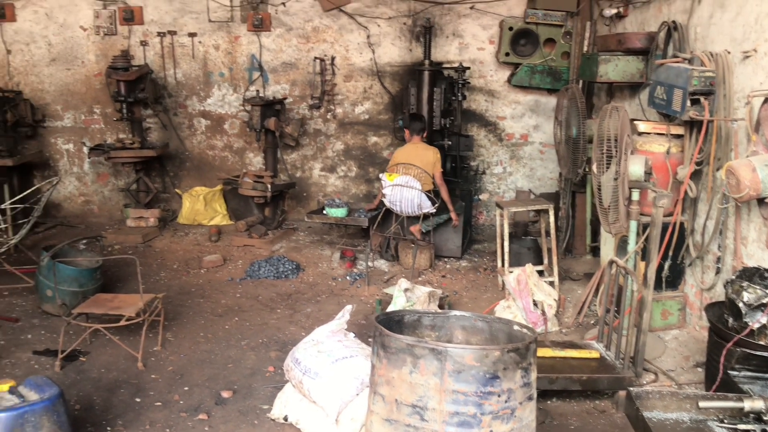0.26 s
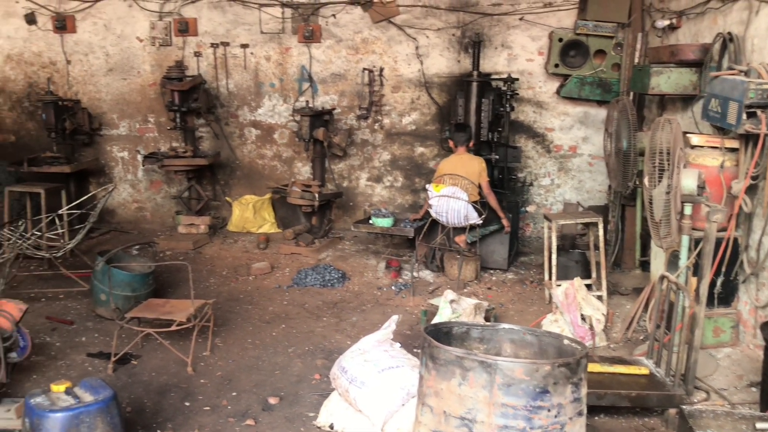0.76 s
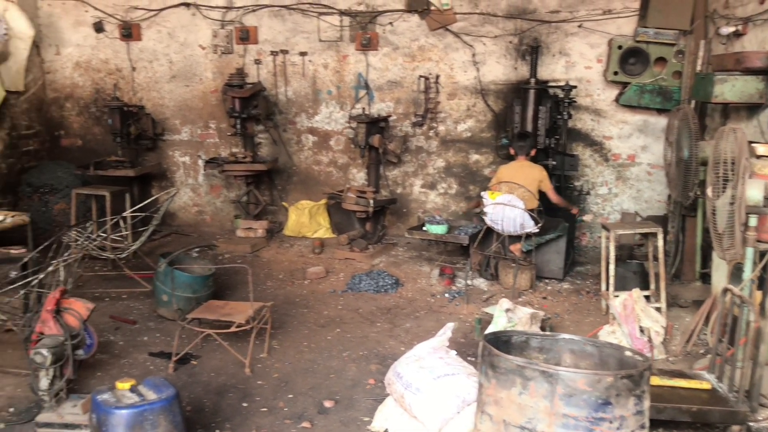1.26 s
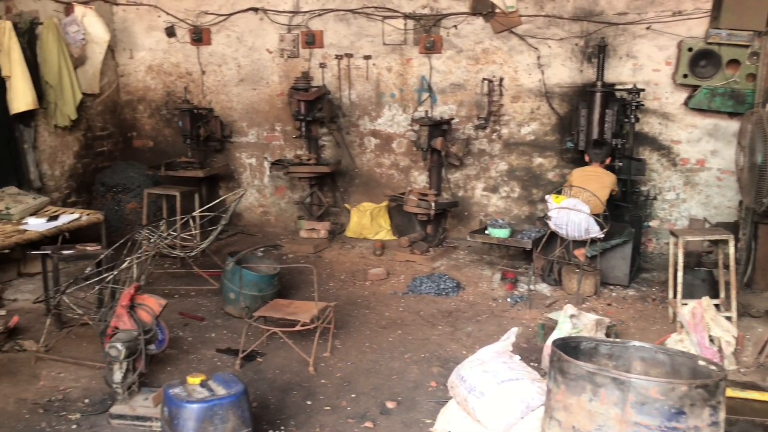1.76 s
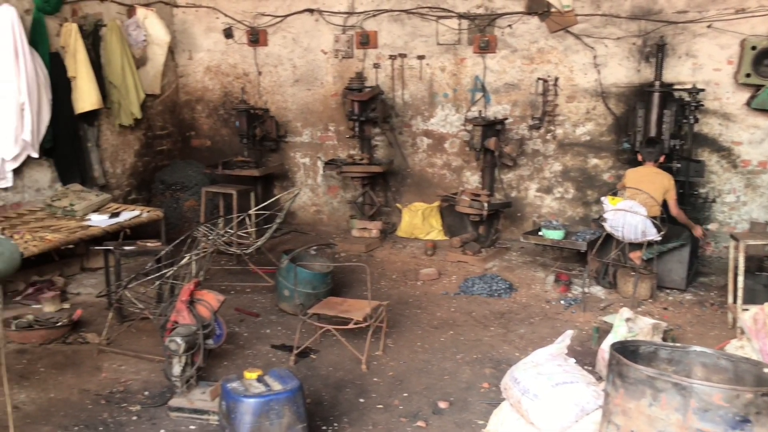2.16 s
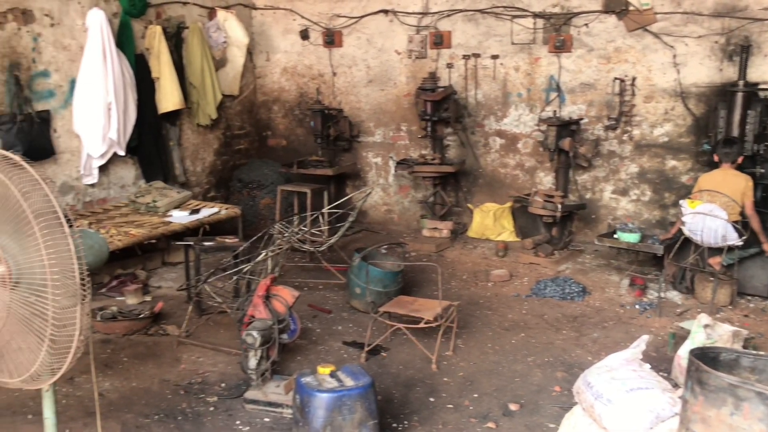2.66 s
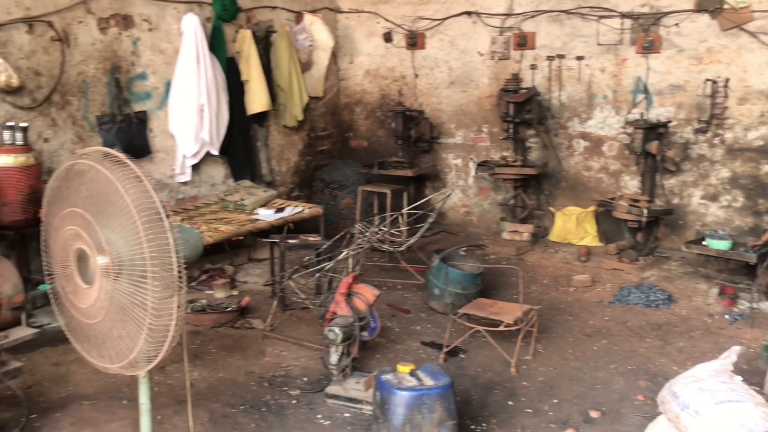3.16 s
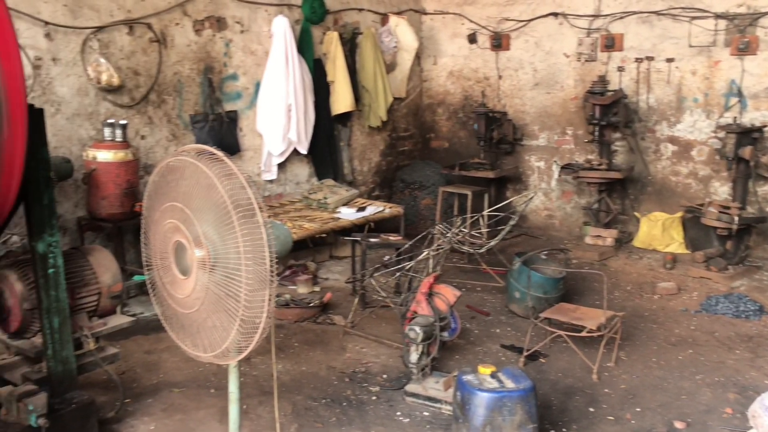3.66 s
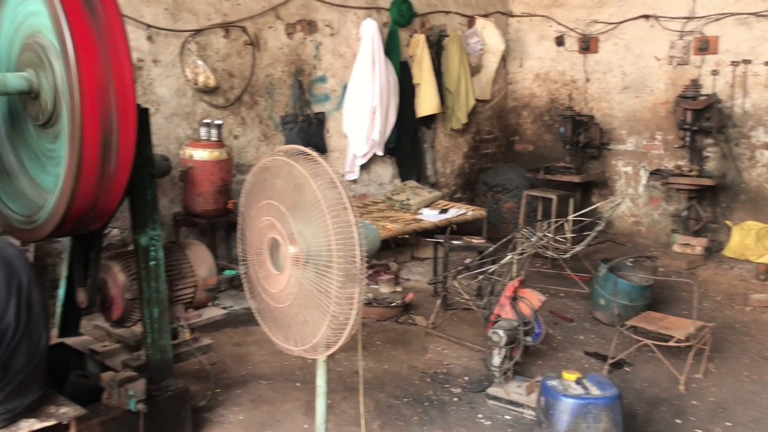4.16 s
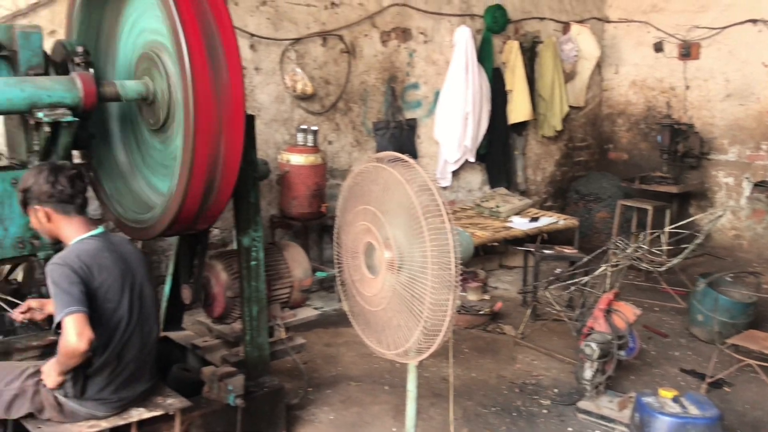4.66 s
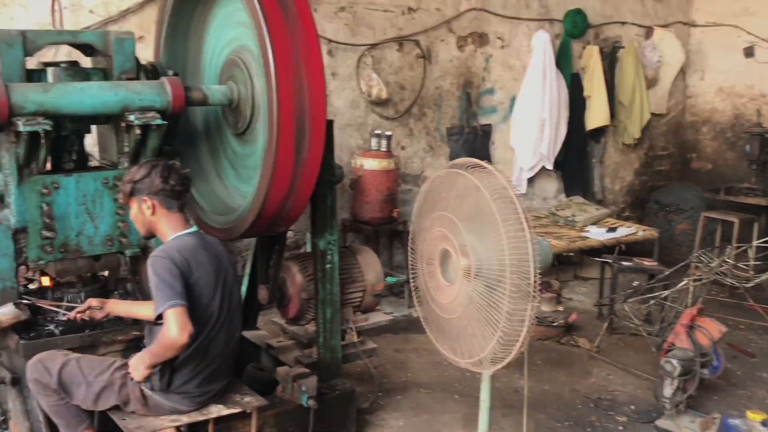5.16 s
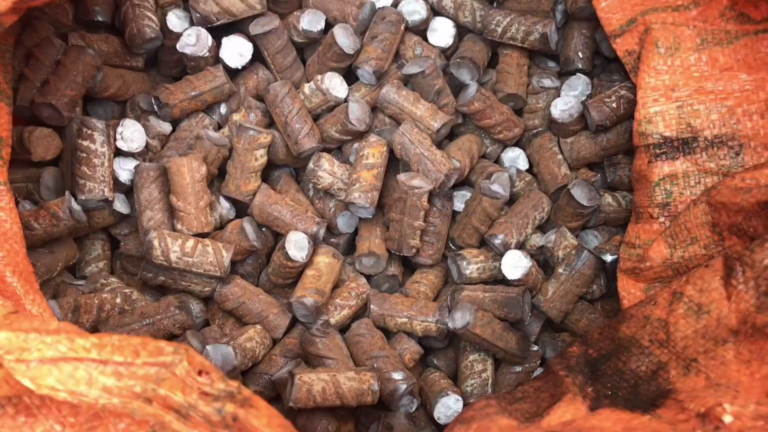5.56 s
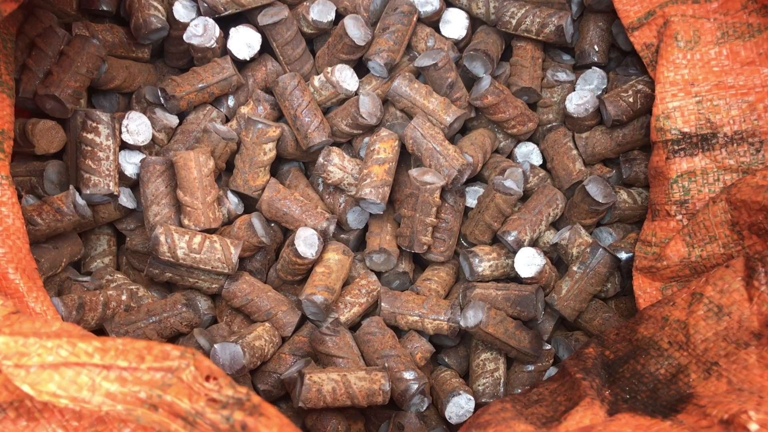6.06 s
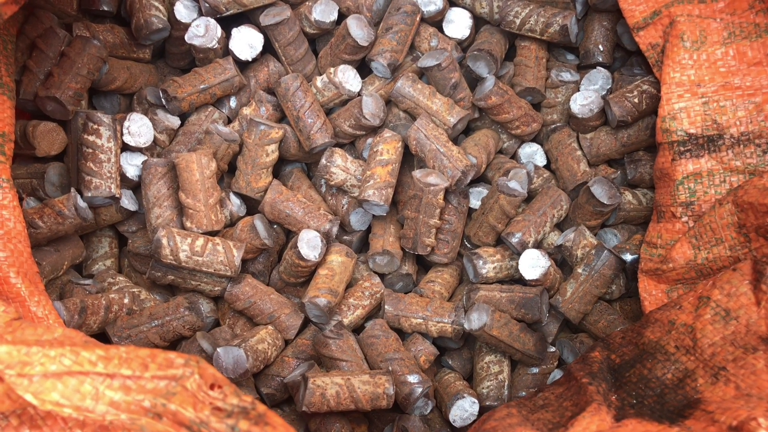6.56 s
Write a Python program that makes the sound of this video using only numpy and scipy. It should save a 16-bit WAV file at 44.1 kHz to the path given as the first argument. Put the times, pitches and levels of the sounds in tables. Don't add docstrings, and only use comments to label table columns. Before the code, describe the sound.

Loud, irregular metal clanks, thuds and rattles ring over rumbling workshop machinery with air hisses, then cut abruptly to a very faint low murmur.

```python
import sys
import numpy as np
from scipy import signal
from scipy.fft import rfft, irfft, next_fast_len
from scipy.io import wavfile
from scipy.ndimage import uniform_filter1d

SR = 44100
rng = np.random.default_rng(int(sys.argv[2]) if len(sys.argv) > 2 else 0)


def master_out(mix):
    frames = np.transpose(np.atleast_2d(mix))
    ceiling = np.clip(frames, -1, 1)
    pcm = np.round(ceiling * 32767).astype(np.int16)
    wavfile.write(sys.argv[1], SR, pcm)


def boost_factor(decibels):
    exponent = np.asarray(decibels, float) / 20
    return 10 ** exponent


N = 300762
T = np.arange(N) / SR


def noise():
    return rng.standard_normal(N)


def level(x, db):
    return x * boost_factor(db) / np.sqrt(np.mean(x ** 2))


def colour(x, table):
    size = 8192
    hz = np.maximum(np.fft.rfftfreq(size, 1 / SR), 1)
    f, db = np.transpose(table)
    ceps = irfft(np.interp(np.log(hz), np.log(f), db) * np.log(10) / 20)
    ceps[1:size // 2] *= 2
    ceps[size // 2 + 1:] = 0
    return signal.fftconvolve(x, irfft(np.exp(rfft(ceps))))[:N]


def resonate(x, hz, width_hz):
    return signal.lfilter(*signal.iirpeak(hz, hz / max(width_hz, 2), fs=SR), x)


def resonate_body(x, modes, widen=1):
    out = np.zeros(N)
    for k, (hz, width_hz, db) in enumerate(modes):
        out += (-1) ** k * boost_factor(db) * resonate(x, hz, widen * width_hz)
    return out


def walk(rate):
    k = int(SR / rate)
    held = np.repeat(rng.standard_normal(N // k + 1), k)
    return 1.44 * uniform_filter1d(uniform_filter1d(held, k), k)[:N]


def grit(scatter_db, smooth):
    size_db = scatter_db * np.minimum(rng.exponential(size=N), 6)
    ticks = noise() * boost_factor(size_db) * (rng.random(N) < .05)
    return level(level(ticks, 0) + smooth * noise(), 0)


def slices(x, per_octave, patchy_db, rate):
    size = next_fast_len(N)
    spec = rfft(x, size)
    octaves = np.log2(np.fft.rfftfreq(size, 1 / SR) + 1)
    for centre in np.arange(4, 14.1, 1 / per_octave):
        window = np.clip(1 - per_octave * abs(octaves - centre), 0, 1)
        yield 2 ** centre, irfft(spec * window, size)[:N] * boost_factor(patchy_db * walk(rate))


# start in [s], blow in [dB], frame thud and brightness in [dB re blow], bar pitch in [Hz].
STROKES = [(0.763, -6.5, -2.5, -10.5, 1260), (.826, -5.5, -6, -15, 373), (.855, -10.5, 1, -7, 603),
           (.931, -14.5, 3, -9, 540), (1.203, -9, -1, -9, 862), (1.269, -10, -2, -11.5, 368.5),
           (1.3095, -8.5, -0.5, -6.5, 624), (2.352, -11.5, 3, -10, 755), (2.384, -8, -8.5, -6.5, 620),
           (2.4694, -10.5, -3.5, -8.5, 688), (2.5873, -8, -0.1, -13.5, 363), (2.915, -22, 8, -12, 287),
           (3.4283, -8, -1, -13.5, 692), (3.4925, -7.5, -1.9, -10.5, 640), (3.5294, -7, -1, -9.5, 1180),
           (3.982, -7, 0.2, -9.5, 603), (4.042, -22, 6, -19, 374), (4.705, -16, 4.5, -18.5, 837),
           (4.941, -10.5, -0.5, -15, 1320), (5.105, -8, -0.5, -16, 709), (5.2515, -10, 2.5, -13, 1222),
           (5.269, -12, 2, -12, 367)]
# start in [s], blow in [dB], brightness in [dB re blow], lower and upper pitch in [Hz].
CLANGS = [(1.236, -5.5, -12, 1280, 2620), (2.1025, -3.5, -7.5, 896, 2590), (2.219, -3.5, -16, 903, 2500),
          (2.246, -7.5, -13.5, 881, 2450), (2.292, -11.5, -15, 915, 2130), (2.4327, -3, -17.5, 670, 2170),
          (3.839, -8, -11.5, 885, 2010), (3.872, -2.5, -7, 877, 2676), (3.926, -4.5, -13, 760, 2460),
          (4.702, -5.5, -12.5, 1177, 2638), (4.961, -7.5, -8, 696, 2710), (5.069, -2.5, -8, 1010, 1930),
          (5.148, -15.5, -19, 1170, 2160)]
# start in [s], blow in [dB], frame thud and brightness in [dB re blow].
KNOCKS = [(.157, -24.5, 2.5, -11), (.26, -24.5, 5.5, -12), (.795, -7, -11, -6.5), (1.032, -16.5, -5.5, -14),
          (1.19, -14.5, 3.5, -7), (1.337, -7.5, -7.5, -17), (1.484, -29.5, 10.5, -8.5),
          (1.525, -28, -6, -2), (1.639, -18.5, -1, -0.5), (2.087, -8.5, -13, -9), (2.137, -9, -12.5, -13),
          (2.6194, -20, -2.5, -20.5), (2.802, -22, 1.5, -16), (2.853, -16, -6.5, -13),
          (3.087, -24, -7, -6.5), (3.167, -18.5, -1.5, -11), (3.206, -22.5, -4.5, -1),
          (3.448, -6, -10.5, -10.5), (3.561, -12, -3, -9.5), (3.665, -16, -4, -8.5),
          (3.739, -14.5, -9, -14), (3.797, -14, -4.5, -7.5), (4.008, -16.5, -3.5, -16), (4.19, -26, -2, -7),
          (4.312, -16, -6.5, -3), (4.884, -19.5, -9.5, -12.5), (5.304, -19, 2.5, -18.5),
          (5.361, -16, -1.5, -5)]
STROKE_RATTLE_S, CLANG_RATTLE_S, KNOCK_RATTLE_S = .03, .016, .03
STROKE_SIZZLE_DB, CLANG_SIZZLE_DB, KNOCK_SIZZLE_DB = -7.5, -8, -7
CLANG_THUD_DB = -8.5


def strikes():
    rows = []
    for s, db, thud, bright, _ in STROKES:
        rows.append((s, db, thud, bright, bright + STROKE_SIZZLE_DB, STROKE_RATTLE_S))
    for s, db, bright, _, _ in CLANGS:
        rows.append((s, db, CLANG_THUD_DB, bright, bright + CLANG_SIZZLE_DB, CLANG_RATTLE_S))
    for s, db, thud, bright in KNOCKS:
        rows.append((s, db, thud, bright, bright + KNOCK_SIZZLE_DB, KNOCK_RATTLE_S))
    return np.transpose(rows)


def bursts(db, rise, t60, uneven_db):
    power = np.zeros(N)
    t = T[:int(.45 * SR)]
    start_s, *_, rattle_s = strikes()
    for start, rattle, gain in zip(start_s, rattle_s, boost_factor(db)):
        decay = np.exp(-np.log(1000) * np.maximum(t - max(rattle, 0), 0) / t60)
        shape = np.minimum(t / rise, 1) * decay
        power[int(start * SR):][:len(t)] += (gain * shape) ** 2
    return np.sqrt(power) * boost_factor(uneven_db * walk(70))


# centre in [Hz], width in [Hz], level in [dB].
FRAME = [(332, 170, 6.5), (624, 100, 11.5), (890, 86, 0), (1180, 19, 2.5), (1440, 74, -4.5)]


def frame_thud():
    _, blow_db, thud_db, *_ = strikes()
    knock = grit(2.5, 1.3)
    modes = resonate_body(knock, FRAME, widen=1.1)
    bulk = resonate(resonate(knock, 750, 1300), 750, 1300)
    frame = level(modes, -1.5) + level(bulk, -1.5)
    return level(frame, -7) * bursts(blow_db + thud_db, .0049, .18, 2.2)


# frequency in [Hz], density in [dB per Hz].
CRASH_COLOUR = [(760, -25), (1300, -1.5), (1740, -11.5), (2640, -1.5), (3290, -10.5), (3830, -11.5),
                (4920, -17.5), (5310, -8), (8000, -21), (10400, -46), (17600, -120)]
# centre in [Hz], width in [Hz], level in [dB].
PRESS = [(2027, 67, 4.5), (2630, 260, -3.5), (3790, 30, 6.5), (4660, 190, -5), (5320, 190, 5),
         (6160, 340, -5.5), (7340, 110, -13)]


def steel_crash():
    _, blow_db, _, crash_db, *_ = strikes()
    steel = grit(1.1, 0.67)
    press = resonate_body(steel, PRESS, widen=1.5)
    spec = rfft(level(colour(steel, CRASH_COLOUR), -1.2) + level(press, -4.5))
    upper = np.clip((np.fft.rfftfreq(N, 1 / SR) - 3000) / 600, 0, 1)
    blow = level(irfft(spec * (1 - upper), N), -14) * bursts(blow_db, .0059, .23, 1.7)
    crash = level(irfft(spec * upper, N), -8.5) * bursts(blow_db + crash_db, .011, .22, 1.6)
    return blow + crash


# frequency in [Hz], density in [dB per Hz].
SIZZLE_COLOUR = [(4120, -31), (7000, -8.5), (8620, -7), (9900, 1), (10500, -5), (11200, -2), (11900, -3.5),
                 (12900, 1.5), (13800, -2.5), (15600, -12.5)]


def scale_sizzle():
    _, blow_db, _, _, sizzle_db, _ = strikes()
    return level(colour(grit(2.2, 1.2), SIZZLE_COLOUR), -3) * bursts(blow_db + sizzle_db, .012, .18, 3.1)


def ring(rings, level_db, rattle, t60):
    out, t = np.zeros(N), T[:int(.4 * SR)]
    split = rng.standard_normal((len(rings), 2))
    for (s, db, first_hz, second_hz, second_db), detune in zip(rings, split):
        gains = boost_factor(db + np.array([0, second_db]))
        for hz, gain, apart in zip((first_hz, second_hz), gains, detune):
            push = rng.standard_normal(len(t)) * np.exp(-t / rattle)
            pair_hz = hz * (1 + .0061 * apart * np.array([0, 1]))
            poles = np.exp(2j * np.pi * pair_hz / SR - np.log(1000) / (t60 * SR))
            tone = np.zeros(len(t))
            for pole, weight in zip(poles, (1, .6)):
                tone += weight * signal.lfilter([1], [1, -pole], push).imag
            out[int(s * SR):][:len(t)] += gain * tone / np.abs(tone).max()
    return boost_factor(level_db) * out


# start in [s], level in [dB], pitch in [Hz], plate in [dB re offcut].
OFFCUTS = [(.797, -12, 5300, -11.5), (1.19, -16, 5270, -8), (1.2344, -10.5, 5320, -1),
           (1.2714, -21.5, 5310, -3.5), (1.3164, -14, 6350, -4), (2.1106, -15, 6410, -7),
           (2.14, -15.5, 5220, -1), (2.224, -16, 5280, 1.5), (2.2543, -19.5, 5330, -8),
           (2.3012, -18, 5150, 0.5), (2.3935, -12, 5220, -3), (2.4332, -16.5, 6170, -9),
           (2.5955, -24, 5580, -9), (3.4546, -18, 5970, -5.5), (3.5644, -21.5, 5200, -6.5),
           (3.8462, -20.5, 6400, -1.5), (3.8844, -14.5, 6160, -4.5), (3.929, -14.5, 5200, 3),
           (3.9917, -19.5, 6140, -6.5), (4.3251, -20, 5320, -14), (4.7144, -16.5, 6030, -19),
           (4.9025, -26.5, 5300, -7.5), (4.9695, -12, 6120, -18.5), (5.0786, -14, 5310, -17.5),
           (5.1294, -19.5, 6220, -10), (5.279, -16.5, 6220, -13)]
RING_LAG_S = .005
STROKE_RING_DB, STROKE_UPPER_HZ, STROKE_UPPER_DB = 2.5, 2200, -17.5
CLANG_RING_DB, CLANG_UPPER_DB = -2.2, -.5
PLATE_HZ, PLATE_WIDTH_HZ = 3780, 45


def bar_rings():
    low, high = [], []
    for s, db, thud, _, hz in STROKES:
        low.append((s + RING_LAG_S, STROKE_RING_DB + db + thud, hz, STROKE_UPPER_HZ, STROKE_UPPER_DB))
    for s, db, _, hz, upper_hz in CLANGS:
        low.append((s + RING_LAG_S, CLANG_RING_DB + db, hz, upper_hz, CLANG_UPPER_DB))
    for s, db, hz, plate_db in OFFCUTS:
        high.append((s, db, hz, PLATE_HZ, plate_db))
    return ring(low, -9, rattle=.025, t60=.21) + ring(high, -5, rattle=.02, t60=.09)


def clanks():
    impacts = frame_thud() + steel_crash() + scale_sizzle()
    flickering = sum(part for _, part in slices(impacts, per_octave=7, patchy_db=2.2, rate=35))
    return flickering + bar_rings()


def plate():
    blow_db = strikes()[1]
    alive = bursts(blow_db - 28, rise=.03, t60=.5, uneven_db=.6)
    return level(resonate(grit(1.8, .96), PLATE_HZ, PLATE_WIDTH_HZ), -6.5) * alive


def room(x, t60, wet_db):
    t = T[:int(.6 * SR)]
    tail = rng.standard_normal(len(t)) * np.exp(-np.log(1000) * t / t60) * (t > .008)
    tail = signal.lfilter([.5], [1, -.5], tail)
    return x + boost_factor(wet_db) * signal.fftconvolve(x, tail / np.sqrt(np.sum(tail ** 2)))[:N]


# start in [s], level in [dB], swell in [s], fade in [s].
PUFFS = [
    (.79, -22, .03, .1),
    (1.315, -30, .012, .03),
    (1.5, -31.5, .04, .08),
    (1.62, -32.5, .015, .04),
    (2.07, -26, .02, 0.019),
    (3.15, -17.5, 0.055, .06),
    (3.487, -28, .008, .02),
    (3.80, -30, .03, .08),
    (3.98, -28, .02, 0.034),
    (4.14, -35, .02, .09),
]


def puffs():
    flow = np.zeros(N)
    for s, db, swell, fade in PUFFS:
        rise = np.clip((T - s) / swell, 0, 1)
        flow += boost_factor(db) * rise * np.exp(-np.maximum(T - s - swell, 0) / fade)
    band_hz = 12830 + 2900 * np.array([-.5, .5])
    jet = signal.sosfilt(signal.butter(3, band_hz, btype="band", fs=SR, output="sos"), noise())
    rush = resonate(resonate(noise(), 9000, 5000), 9000, 5000)
    return (level(jet, 0) + level(rush, -10)) * flow * boost_factor(1.2 * walk(28))


# time in [s], pitch in [Hz], level in [dB].
SQUEAL = [
    (4.2, 1398, -42),
    (4.3, 1392, -33),
    (4.5, 1400, -33),
    (4.68, 1400, -31),
    (4.78, 1400, -32.5),
    (4.9, 1394, -38),
]


def squeal():
    s, hz, db = np.transpose(SQUEAL)
    pitch_hz = np.interp(T, s, hz) * (1 + .0008 * walk(58))
    phase = 2 * np.pi * np.cumsum(pitch_hz) / SR
    loudness = boost_factor(np.interp(T, s, db, -90, -90) + 1.5 * walk(30))
    return np.sqrt(2) * loudness * np.sin(phase)


def shaking(db, fade_s):
    power = np.zeros(N)
    np.add.at(power, (strikes()[0] * SR).astype(int), boost_factor(db) ** 2)
    return signal.lfilter([1], [1, -np.exp(-1 / (max(fade_s, .01) * SR))], power)


# time in [s], motor load in [dB], air pressure in [dB].
RUNNING = [(0.0, -17, -35), (.12, -21.5, -36), (.48, -21.5, -35), (.9, -18, -30), (1.03, -19, -36.5),
           (1.17, -20.5, -31.5), (1.42, -19, -37), (1.6, -24, -32), (2.03, -20.5, -33.5), (2.33, -24, -38),
           (2.76, -21.5, -37.5), (3.1, -22, -33), (3.36, -22, -38.5), (3.85, -20.5, -31),
           (4.11, -27.5, -42), (4.24, -24, -38.5), (4.61, -24, -36.5), (5.2, -20.5, -34)]
# level in [dB], share of load [ratio], share of air [ratio], shaken in [dB re blow].
LAYERS = [
    (-25, 0.69, 0.045, -23),
    (-26, 0.76, 0.038, -18),
    (-38.5, 0.12, 0.28, -26.5),
    (-39.5, .05, .9, -39),
]
BAND_EDGES_HZ = [450, 3000, 10500]
# frequency in [Hz], density in [dB per Hz].
RUMBLE_COLOUR = [(22, -32.5), (32, -21.5), (45, -8), (58, -0.5), (70, -10), (95, 0), (125, -1.35),
                 (180, -6), (226, -5.5), (290, -0.95), (366, -3), (480, -15), (640, -40)]
SHOP_COLOUR = [(88, -33.5), (150, -6), (197, -5), (302, 1), (420, -4), (491, -13.5), (585, -1), (739, -6.5),
               (1380, -5.5), (1670, -9.5), (2330, -12.5), (4870, -21.5), (10400, -24), (12900, -25),
               (15600, -39)]
# centre in [Hz], width in [Hz], level in [dB].
SHOP_BODY = [(603, 36, 2), (1400, 17, -4.5), (4050, 37, -19), (5400, 450, -19)]


def machines():
    s, load_db, air_db = np.transpose(RUNNING)
    load_db = np.interp(T, s, load_db - np.mean(load_db))
    air_db = np.interp(T, s, air_db - np.mean(air_db))
    body = resonate_body(noise(), SHOP_BODY)
    shop = colour(grit(1.8, 3.6), SHOP_COLOUR) + boost_factor(-5.5) * body
    parts = np.zeros((4, N))
    for hz, part in slices(shop, per_octave=3, patchy_db=.98, rate=18):
        parts[np.searchsorted(BAND_EDGES_HZ, hz)] += part
    parts[0] = sum(part for _, part in slices(colour(noise(), RUMBLE_COLOUR), 1.8, 1.6, 9))
    shake = shaking(strikes()[1], fade_s=.08)
    out = np.zeros(N)
    for part, (db, by_load, by_air, shaken_db) in zip(parts, LAYERS):
        steady = boost_factor(db + by_load * load_db + by_air * air_db)
        out += level(part, 0) * np.sqrt(steady ** 2 + boost_factor(shaken_db) ** 2 * shake)
    return out


# frequency in [Hz], density in [dB per Hz].
FAINT_COLOUR = [(15, -51), (25, -18), (75, -1.5), (104, -10.5), (140, -7), (247, -8.5), (275, -8.5),
                (497, -13), (1120, -12.5), (1860, -17), (4290, -20.5), (4910, -22), (15600, -29.5)]


def faint_shop():
    return level(colour(grit(1.5, 2.2), FAINT_COLOUR) * boost_factor(.6 * walk(9)), -58.5)


def thin_treble(x, edge_hz, swing_hz, thin):
    hz, _, spec = signal.stft(x, SR, nperseg=2048)
    moments = spec.shape[1]
    edge = edge_hz + swing_hz * np.repeat(rng.standard_normal(moments), 2)[:moments]
    usual = np.sqrt(uniform_filter1d(abs(spec) ** 2, size=32, axis=0))
    strong = (abs(spec) > thin * usual) | (hz[:, None] < 5500)
    spec = spec * (hz[:, None] < edge) * strong
    return signal.istft(spec, SR, nperseg=2048)[1][:N]


# frequency in [Hz], gain in [dB].
MICROPHONE = [(4300, -0.2), (4900, -2), (5300, 0.53), (9800, -0.5), (10500, -2.5), (11000, 1.3)]
CUT_S, RESUME_S = 5.380, 5.427


def scene():
    hall = room(clanks() + plate(), t60=.39, wet_db=-12)
    loud = colour(hall + machines() + squeal() + puffs(), MICROPHONE)
    loud = np.tanh(1.107 * loud) / 1.107
    loud = thin_treble(loud, edge_hz=15250, swing_hz=340, thin=.43)
    loud = loud * np.clip((CUT_S - T) / .0055, 0, 1)
    gap_hiss = level(noise(), -88.5)
    return np.tile(loud + faint_shop() * (T > RESUME_S) + gap_hiss, (2, 1))


def roll_off(x):
    return signal.sosfilt(signal.butter(12, 15780, fs=SR, output="sos"), x)


def record(dry):
    top = signal.ellip(8, .2, 70, 15700, fs=SR, output="sos")
    mix = signal.sosfilt(top, dry)
    return roll_off(mix)


dry = scene()
out = record(dry)
master_out(out)
```